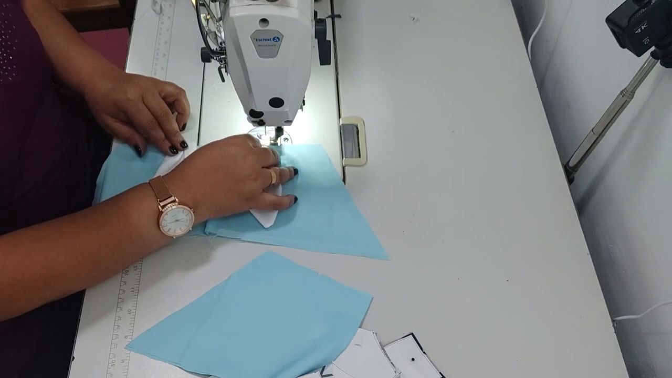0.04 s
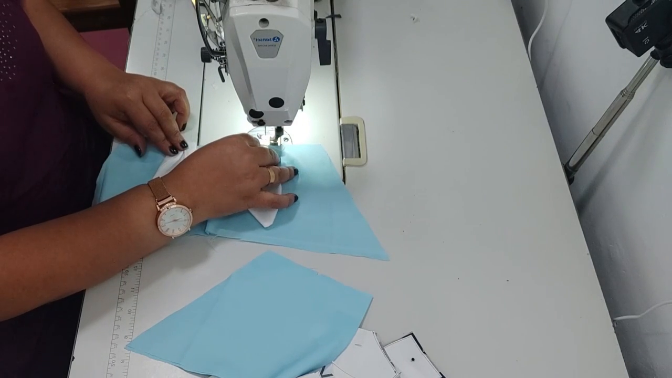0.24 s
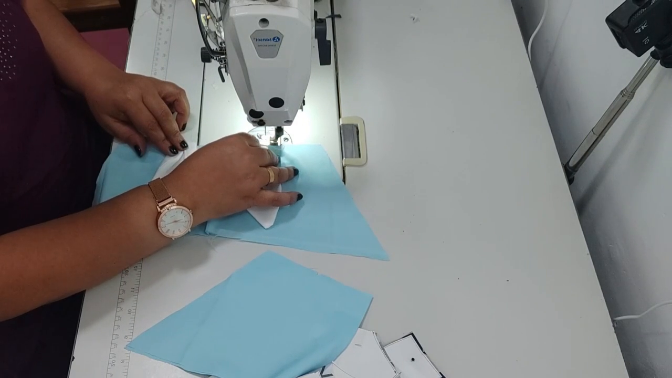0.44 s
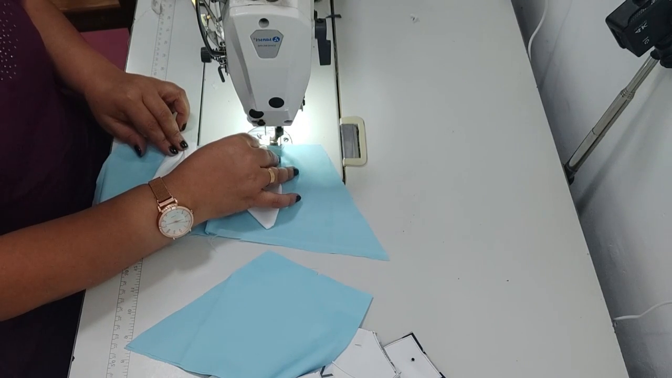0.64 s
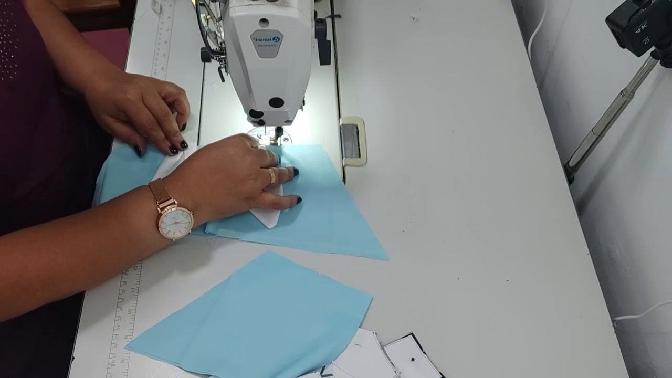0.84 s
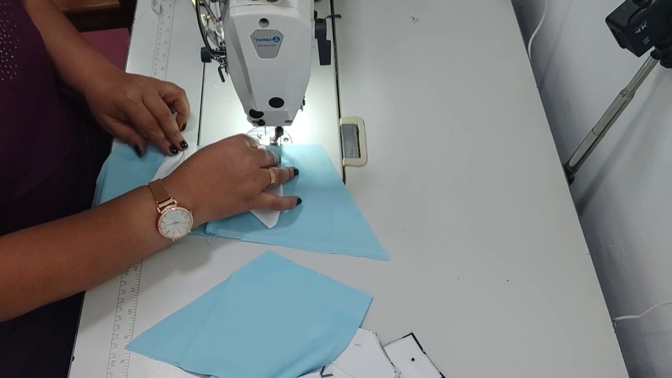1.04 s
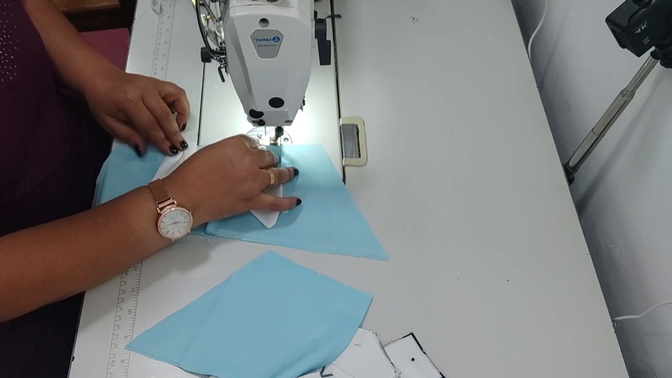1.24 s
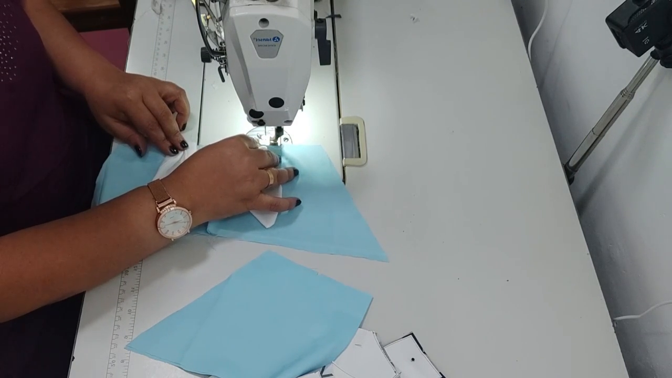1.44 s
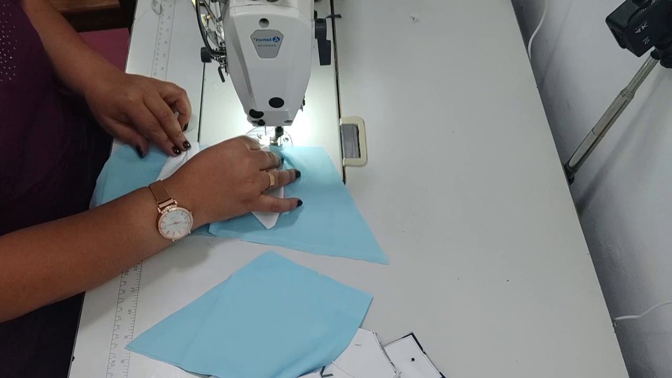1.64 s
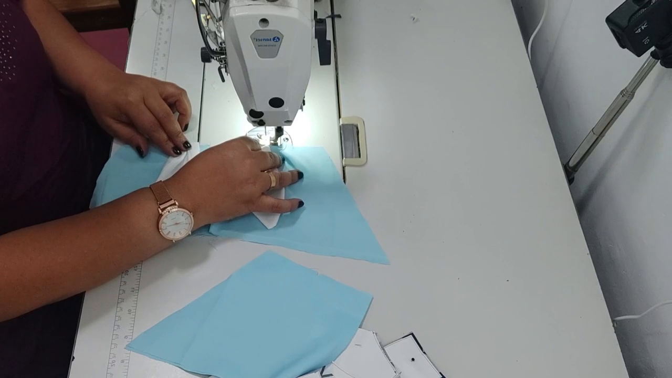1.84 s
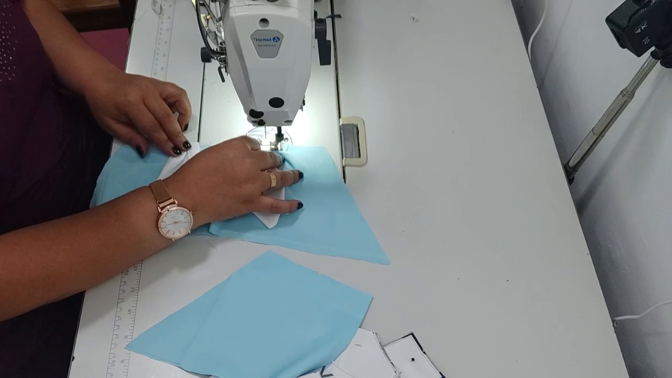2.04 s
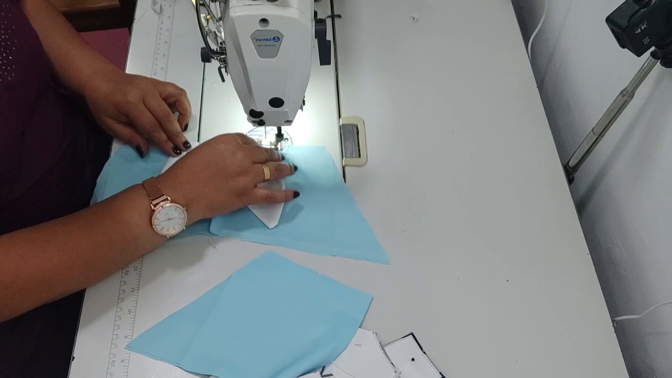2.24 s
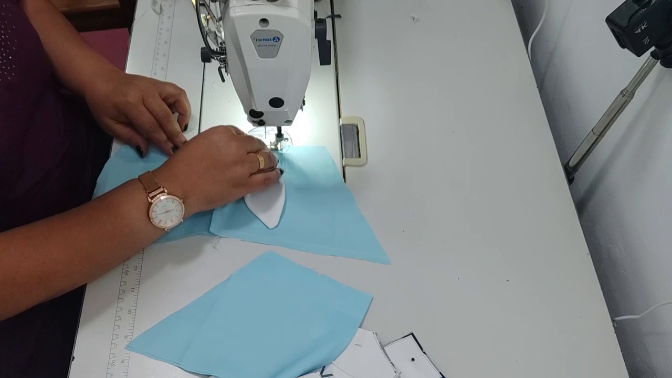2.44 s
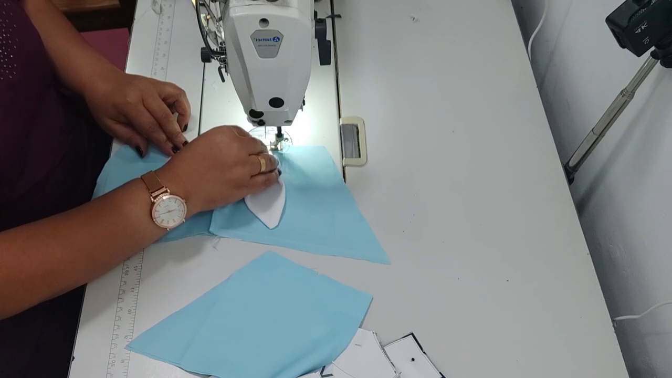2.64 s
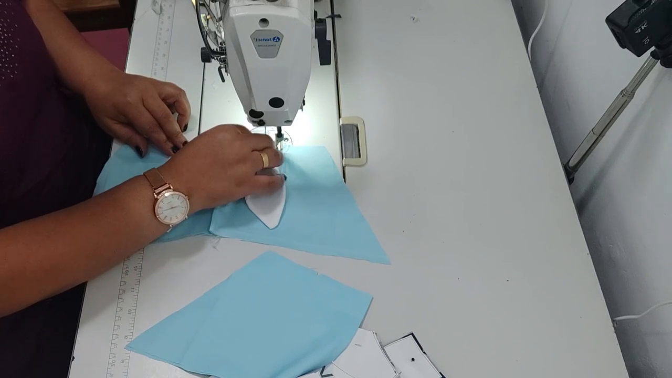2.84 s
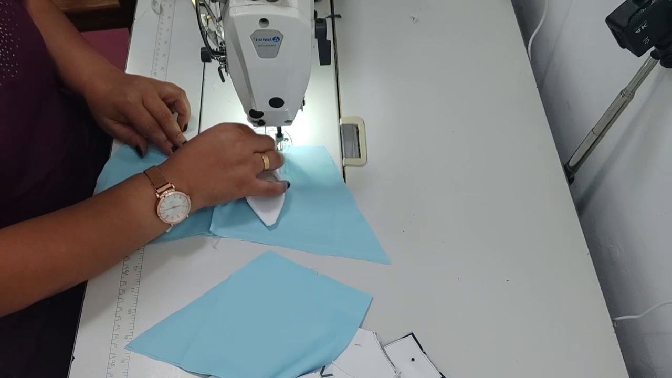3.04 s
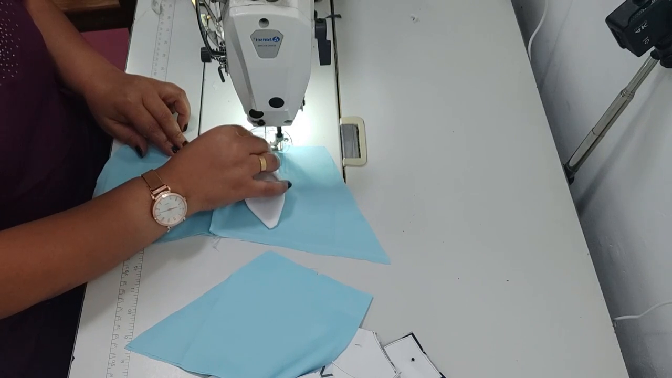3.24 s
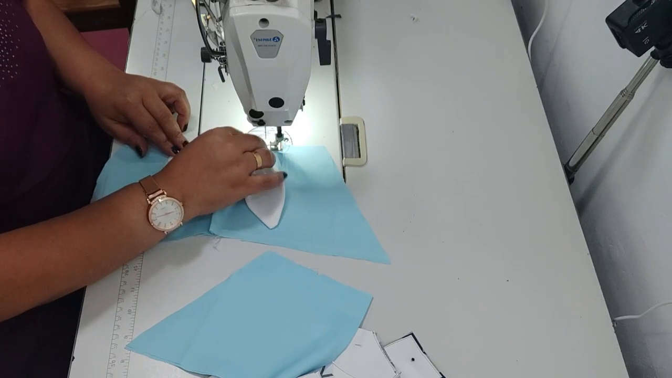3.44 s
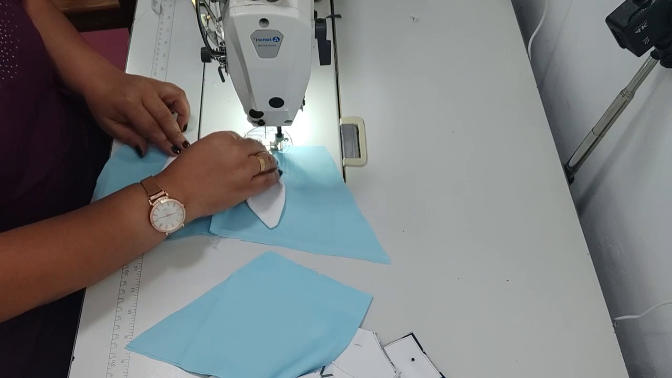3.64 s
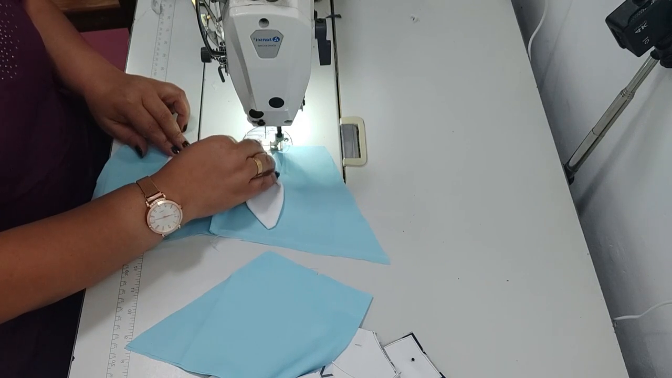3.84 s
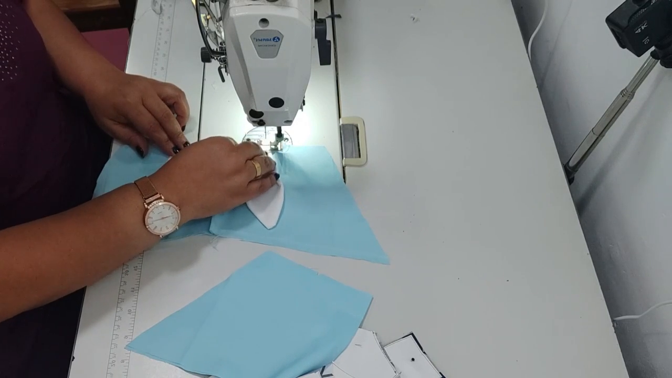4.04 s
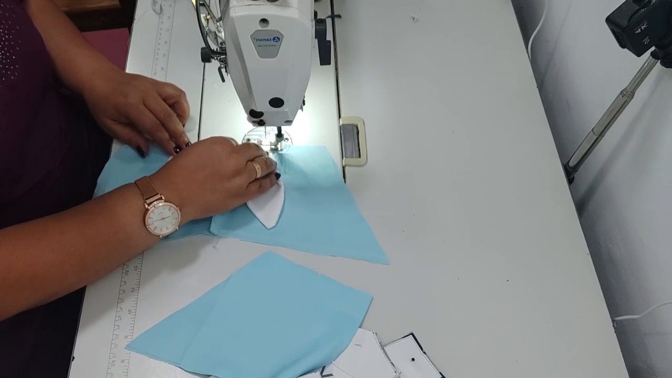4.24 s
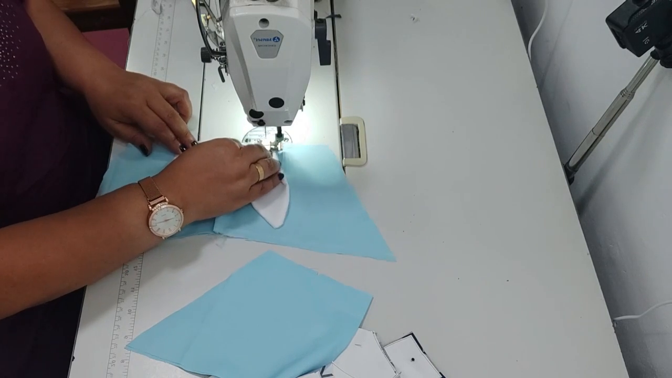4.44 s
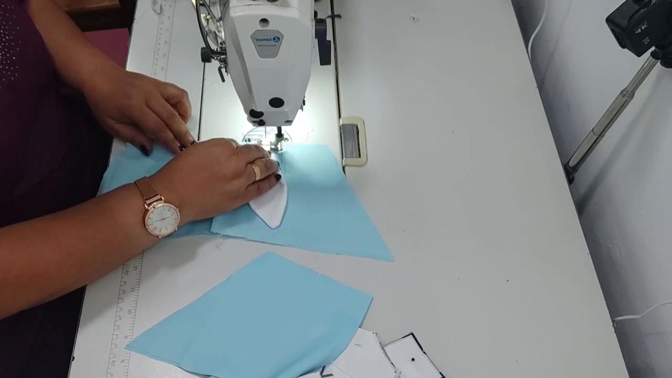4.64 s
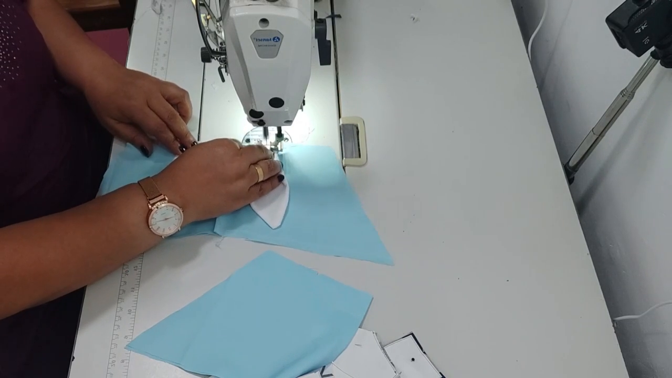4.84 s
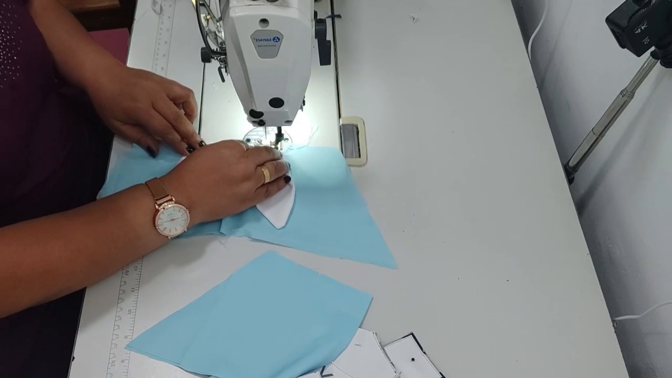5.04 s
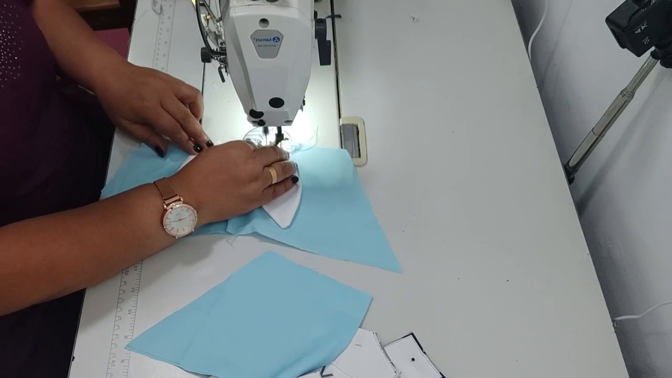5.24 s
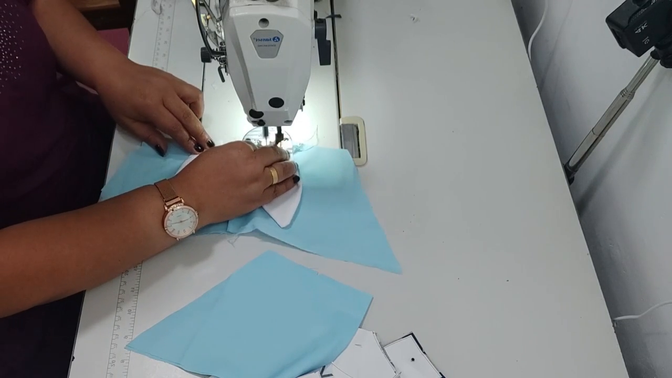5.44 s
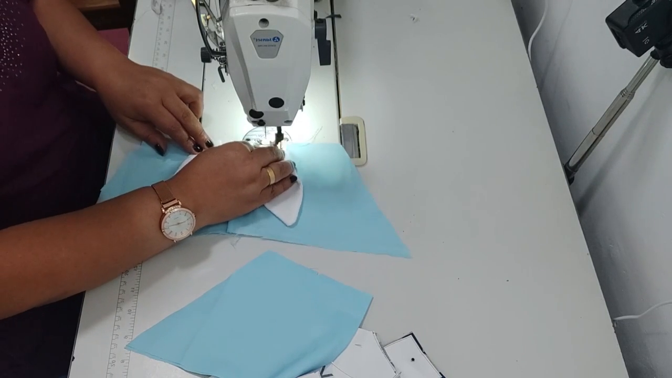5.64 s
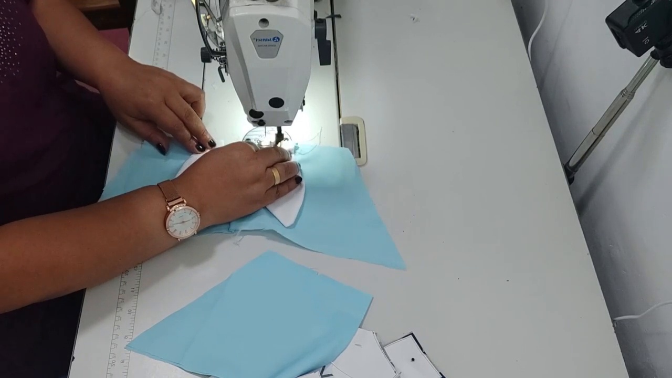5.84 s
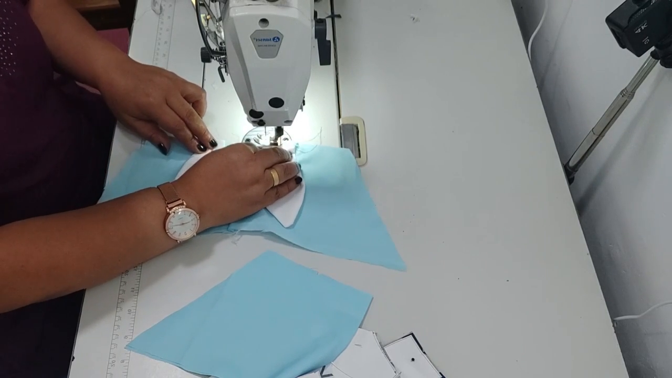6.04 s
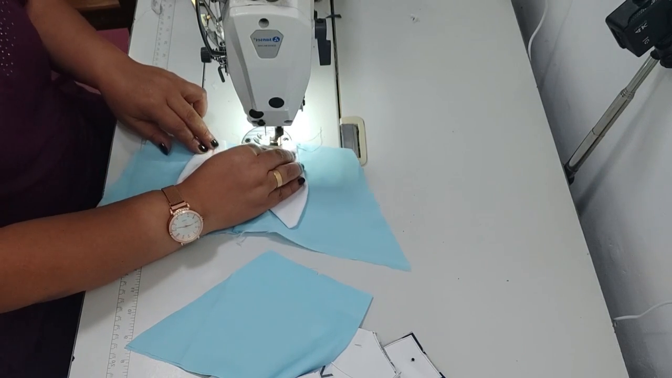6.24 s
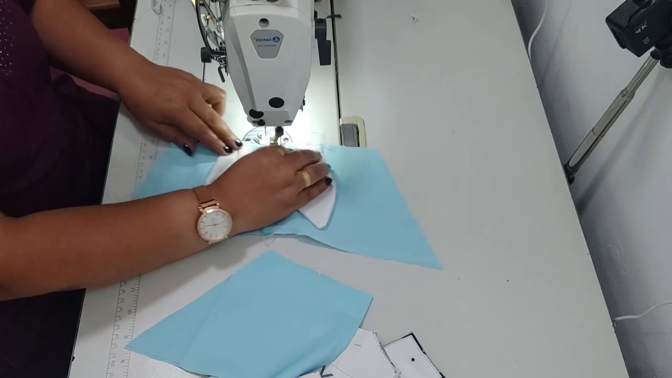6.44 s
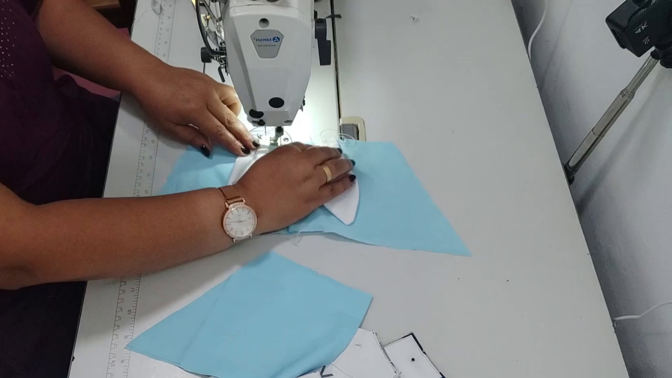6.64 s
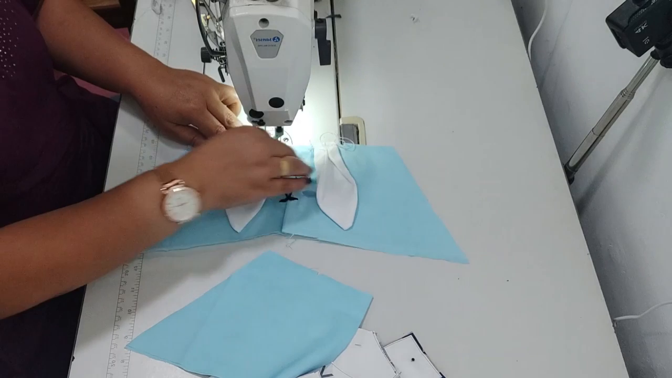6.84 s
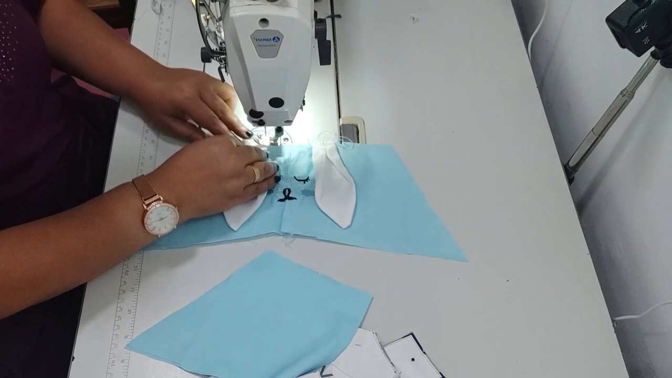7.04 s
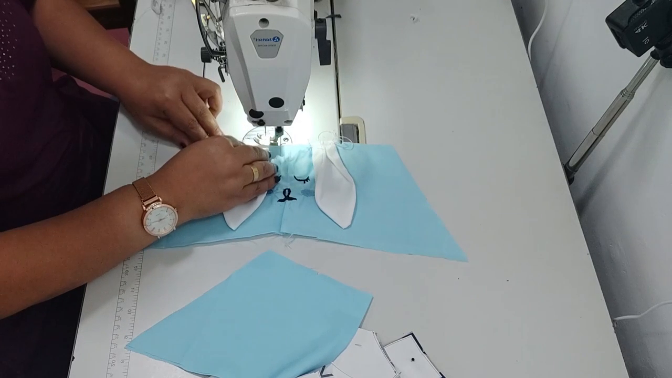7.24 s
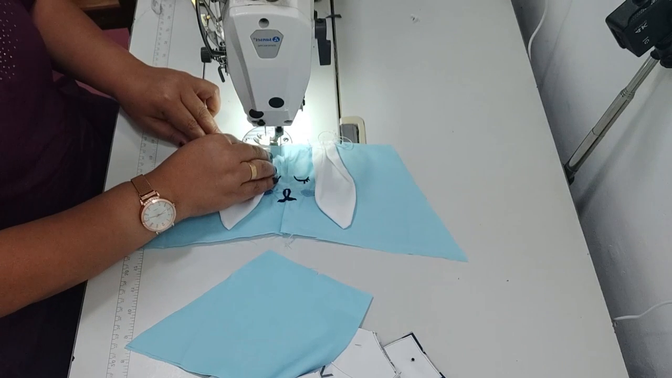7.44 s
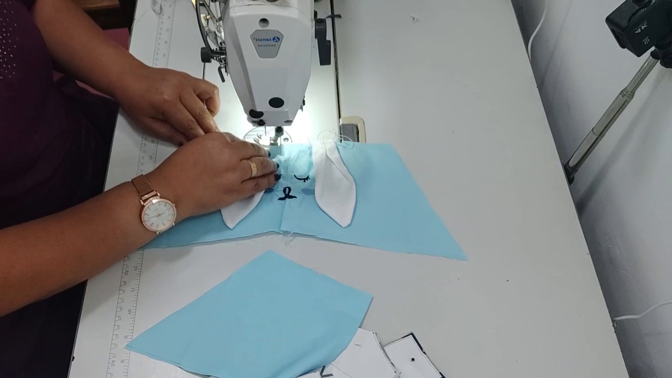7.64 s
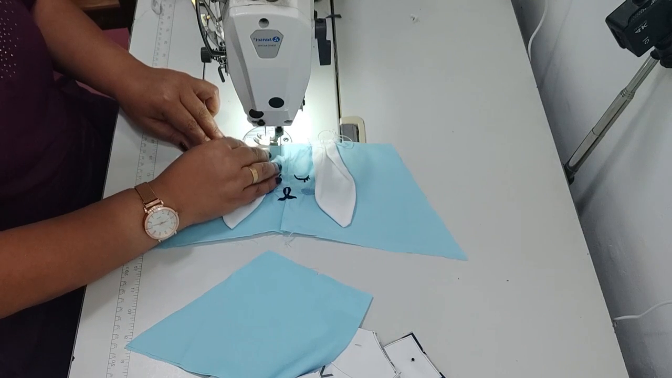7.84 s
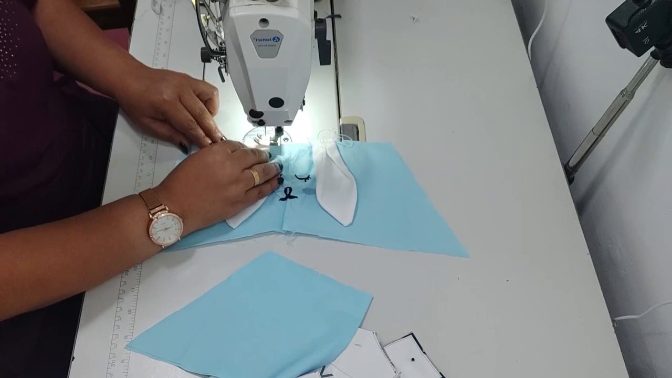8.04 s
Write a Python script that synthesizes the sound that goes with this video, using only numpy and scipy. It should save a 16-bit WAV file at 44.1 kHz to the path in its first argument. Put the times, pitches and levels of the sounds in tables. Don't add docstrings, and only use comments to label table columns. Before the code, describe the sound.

In a small hard-walled workroom with low hum and hiss, an industrial sewing machine's foot drops with a sharp clack and woody thud. After a quiet wait, stitching chatters in two fast uneven bursts, with bright clicks, table thumps and a short motor whine. Heavy trimmer clacks end it, a thin part rings, and cloth hisses as it is pulled. Close stereo pickup above the table, bass leaning left.

```python
import sys
import numpy as np
from scipy import signal
from scipy.fft import rfft, irfft
from scipy.io import wavfile
from scipy.ndimage import uniform_filter1d

SR = 44100
rng = np.random.default_rng(int(sys.argv[2]) if len(sys.argv) > 2 else 0)


def ratio(d):
    e = np.asarray(d, float) / 20
    return 10 ** e


def master(y):
    cut = np.clip(np.atleast_2d(y).T, -1, 1)
    pcm = np.round(cut * 32767)
    wavfile.write(sys.argv[1], SR, pcm.astype(np.int16))


N = 357210
T = np.arange(N) / SR


def unit(x):
    return x / np.sqrt(np.mean(x ** 2))


def colour(x, points):
    hz, db = np.transpose(points)
    f = np.fft.rfftfreq(N, 1 / SR) + 1
    curve_db = np.interp(np.log(f), np.log(hz), db, left=-90, right=-90)
    return irfft(rfft(x) * unit(ratio(curve_db)), N)


def band(x, hz, width_hz):
    b, a = signal.iirpeak(hz, hz / width_hz, SR)
    return signal.lfilter(b, a, x) * np.sqrt(SR / (np.pi * width_hz))


def ring(force, modes):
    out = 0
    for hz, db, t60_s in modes:
        pole = np.exp(2j * np.pi * hz / SR - np.log(1000) / (t60_s * SR))
        out = out + ratio(db) * signal.lfilter([1], [1, -pole], force).imag
    return out


def columns(rows):
    s, *rest = np.transpose(rows)
    return [np.interp(T, s, c) for c in rest]


def hold(start_s, length_s, edge_s):
    on = 1. * ((T > start_s) & (T < start_s + length_s))
    return uniform_filter1d(on, size=max(int(edge_s * SR), 1))


def gate(rows):
    return hold(rows[0][0], rows[-1][0] - rows[0][0], .02)


def walk(rate_hz):
    k = int(SR / rate_hz)
    steps = np.repeat(rng.standard_normal(N // k + 1), k)
    return 1.6 * uniform_filter1d(steps, k)[:N]


# freq_hz, left_minus_right_db, likeness [0-1]
MACHINE_SIDES = [(100, 4.5, 0.99), (397, 8, 1), (800, 4.5, 0.3), (1500, 3, 0), (4400, -0.5, 0.2),
                 (8000, 0.5, 0), (15000, 6, 0.19)]


def pair(sides=MACHINE_SIDES):
    hz, pan_db, like = np.transpose(sides)
    f = np.log(np.fft.rfftfreq(N, 1 / SR) + 1)
    like = np.clip(np.interp(f, np.log(hz), like), 0, 1)
    mid, side = rfft(rng.standard_normal((2, N))) * np.sqrt([(1 + like) / 2, (1 - like) / 2])
    tilt = ratio(np.interp(f, np.log(hz), pan_db) / 2)
    return irfft([(mid + side) * tilt, (mid - side) / tilt], N)


# freq_hz, density_db_per_hz
FLOOR_CURVE = [(12, -38), (20, 0), (38, -5), (103, -8.5), (120, -16), (194, -11), (233, -16), (346, -20.5),
               (528, -24.5), (603, -24), (1440, -34.5), (5120, -30), (5990, -30.5), (7800, -20.5),
               (11000, -54), (14300, -77.5), (22000, -120)]
# freq_hz, left_minus_right_db, likeness [0-1]
FLOOR_SIDES = [(60, 4, 0.6), (300, 8, 0.5), (695, 3, 0), (1400, 3.5, .3), (2780, 1, 0), (5000, -3.5, 0.13),
               (8950, -3, 0), (12000, 11, 0.17)]
# freq_hz, level_db
HUM_TONES = [(97, -62), (200, -69), (604, -79)]
# start_s, length_s, level_db
SIZZLE_SPELLS = [
    (0.342, 1.04, -84),
    (1.55, 0.42, -88),
    (2.85, 0.75, -84.5),
]
# centre_hz, width_hz, level_db
SIZZLE_BANDS = [(2270, 110, 7), (5220, 140, 13.5), (8800, 540, 18), (11700, 1400, 4.5), (13400, 1400, -1)]


def workroom():
    floor = ratio(-52.5 + 0.37 * walk(3.1)) * unit(colour(pair(FLOOR_SIDES), FLOOR_CURVE))
    hum = 0
    for hz, db in HUM_TONES:
        hum = hum + ratio(db + 3.5 + 1.6 * walk(34)) * np.sin(2 * np.pi * hz * T + 0.64 * walk(5.8))
    swell = sum(ratio(db) * hold(s, length_s, 0.074) for s, length_s, db in SIZZLE_SPELLS)
    sizzle = 0
    for hz, width_hz, db in SIZZLE_BANDS:
        tone = band(band(pair(), hz, width_hz), hz, width_hz)
        sizzle = sizzle + ratio(db) * tone * np.sqrt(width_hz / SR)
    return floor + hum * ratio([[3], [-3]]) + ratio(7) * swell * sizzle


# start_s, swell_s, fade_s, peak_db, scrape_share_db [1.5-4 kHz]
CLOTH_SLIDES = [
    (1.62, 0.094, .75, -51.5, -19),
]
CLOTH_PULLS = [
    (6.25, 0.36, .3, -44.5, -14),
    (6.64, .1, 0.048, -58.5, 4.5),
    (7.0, .12, .7, -56.5, -20),
    (7.56, .14, .3, -63.5, -22),
    (7.95, .08, .5, -62, -14.5),
]
# freq_hz, density_db_per_hz
SCRAPE_CURVE = [(900, -21), (1500, -8), (2300, -3.5), (3200, -7), (5000, -14), (6500, -31)]


def cloth():
    end_db = -13.5
    slide_curve = [(6500, -18), (8000, -11.0), (8800, -0.5), (9600, -20.5)]
    brush_curve = [(120, -4.5), (300, 4), (700, -8), (1000, -29.5)]
    out = 0
    for rows, bright in ((CLOTH_SLIDES, slide_curve), (CLOTH_PULLS, METAL_CURVE)):
        rub, scrape, flicker = 0, 0, ratio(1.2 * walk(60))
        for s, swell_s, fade_s, db, scrape_db in rows:
            stroke = [(s, db + end_db), (s + swell_s, db), (s + swell_s + fade_s, db + end_db)]
            shape = gate(stroke) * ratio(columns(stroke)[0]) * flicker
            rub = rub + shape
            scrape = scrape + ratio(scrape_db) * shape
        out = out + colour(rub * pair(), bright) + colour(scrape * pair(), SCRAPE_CURVE)
        out = out + colour(rub * ratio(-14) * pair(), brush_curve)
    return out


# start_s, pitch_hz, peak_db, t60_s
LOOSE_RINGS = [
    (2.08, 738, -53, .8),
    (6.135, 722, -43, .8),
    (6.39, 610, -51, .6),
    (6.42, 990, -60, .25),
]


def loose_parts():
    out = 0
    for s, hz, db, t60_s in LOOSE_RINGS:
        t = np.maximum(T - s, 0)
        decay = (1 - np.exp(-t / 0.0081)) * 1000. ** (-t / t60_s)
        out = out + ratio(db) * np.sin(2 * np.pi * hz * t) * decay
    return out * ratio([[2.5], [-2.5]])


# start_s, length_s, first_hz, last_hz, level_db
MOTOR_WHINE = [
    (4.304, 0.26, 976, 940, -43.5),
    (4.598, 0.065, 1060, 920, -42.5),
    (4.951, 0.45, 936, 950, -49.5),
    (5.392, 0.09, 1032, 1089, -34.5),
    (5.52, 0.069, 1065, 1010, -31),
]


def whine():
    wander, flicker, shiver = 1 + .012 * walk(14), ratio(2.0 * walk(40)), .5 * walk(150)
    out = 0
    for s, length_s, first_hz, last_hz, db in MOTOR_WHINE:
        pitch_hz = np.interp(T, [s, s + length_s], [first_hz, last_hz]) * wander
        phase = 2 * np.pi * np.cumsum(pitch_hz) / SR
        out = out + hold(s, length_s, .015) * ratio(db) * flicker * np.sin(phase + shiver)
    return out * ratio([[1.5], [-1.5]])


def rattle():
    t60_s = 0.067
    kicks = np.zeros(N)
    for rows, share_db in ((KNOCKS_ARM, -25.5), (STITCH_STROKES, -24.5)):
        for s, db, *_ in rows:
            kicks[int(s * SR)] = ratio(db + share_db)
    return signal.lfilter([1], [1, -1000. ** (-1 / (t60_s * SR))], kicks)


def backlash():
    gain, lead_s = np.ones(N), T[:SR // 40][::-1]
    for s, *_ in all_clicks():
        i = int(s * SR)
        gain[i - len(lead_s):i] *= 1 - .55 * np.exp(-lead_s / .005)
    return gain


# time_s, clatter_db [follows speed], shake_db [load on the frame]
SHAFT_RUN = [(3.8, -62.5, -75.5), (4.01, -55, -54), (4.1, -45.5, -40), (4.23, -80, -79.5),
             (4.265, -45.5, -39), (4.36, -23, -35), (4.44, -22, -29), (4.6, -24, -33.5),
             (4.68, -35.5, -39.5), (4.87, -37, -43.5), (5.09, -20.5, -34.5), (5.3, -28.5, -38),
             (5.37, -20.5, -25.5), (5.51, -45.5, -44), (5.73, -18, -25.5), (5.8, -28.5, -36),
             (5.98, -23.5, -29), (6.09, -48.5, -40.5)]
# start_s, length_s, rumble_db, sway_db [once a turn]
HEAD_SWAYS = [
    (4.06, .07, -46.5, -43),
    (4.38, .26, -40, -33.5),
    (4.644, .7, -51.5, -63.5),
    (5.353, .14, -34.5, -44.5),
    (5.6, .1, -49.5, -45),
    (5.687, .22, -42.5, -35),
    (5.92, .25, -55.5, -63),
]
# freq_hz, density_db_per_hz
GEAR_CURVE = [(530, -24.5), (900, -6), (1020, -8), (1080, -7.5), (1360, -9), (1820, -5), (2080, -3.5),
              (2580, -5.5), (3180, -11.5), (5000, -10), (6500, -32.5), (11000, -120)]


def running():
    coast_s, coast_db, turn_hz = .25, -22, 29.77
    last_s, *last_db = SHAFT_RUN[-1]
    rows = SHAFT_RUN + [(last_s + coast_s, *(np.add(last_db, coast_db)))]
    clatter_db, shake_db = columns(rows)
    gear_db = -7 + 0.45 * clatter_db + 0.55 * shake_db
    turn = 2 * np.pi * np.cumsum(turn_hz * (1 + 0.074 * walk(2.9))) / SR

    ticks = (rng.random(N) < 300 / SR) * ratio(np.minimum(3.0 * rng.exponential(size=N), 9))
    smear = signal.lfilter([1], [1, -np.exp(-1 / (0.0026 * SR))], ticks)
    throb = ratio(1.5 * np.sin(turn) + 1.2 * walk(60))
    grain = backlash() * unit(1 + .3 * smear) * throb
    clatter = colour(grain * ratio(clatter_db) * pair(), METAL_CURVE)
    gears = colour(grain * (ratio(gear_db + 3.4 * walk(30)) + rattle()) * pair(), GEAR_CURVE)

    frame = unit(ring(pair(), TABLE_MODES)) + ratio(-9.5) * unit(ring(pair(), ARM_MODES))
    shake = ratio(shake_db) * frame
    low_curve = [(20, -6.0), (30, -9.0), (55, -21.5), (85, 3.5), (105, 4), (130, -9.5)]
    low = colour(pair([(100, 5.5, 0.9)]), low_curve)
    rumble, rocking = sum(ratio(np.c_[db]) * hold(s, length_s, .05) for s, length_s, *db in HEAD_SWAYS)
    sway = rocking * np.sin(turn) * ratio([[3], [-3]]) + rumble * low
    return gate(rows) * (clatter + shake + sway) + gears


# time_s, peak_db, table_hz [favoured]
STITCH_STROKES = [(4.254, -32, 271), (4.281, -22.5, 283), (4.372, -15.5, 275), (4.408, -16, 278),
                  (4.479, -6.5, 320), (4.523, -33, 297), (4.557, -15, 280), (4.592, -8, 290.4),
                  (4.628, -28, 254), (4.795, -19.5, 275), (4.934, -21, 293), (5.014, -18.5, 274),
                  (5.071, -9.5, 269), (5.122, -16.5, 276), (5.194, -16.5, 275), (5.727, -21, 275)]
# time_s, peak_db, arm_share_db, table_hz, arm_hz [favoured]
KNOCKS_ARM = [(1.969, -44.5, -7.5, 359, 697), (2.076, -10, -8.5, 277, 532), (2.168, -22.5, -14, 291, 719),
              (3.174, -54, 7.5, 167, 1090), (3.85, -51, -1, 164, 920), (3.943, -48, 7.5, 161, 1000),
              (4.051, -29.5, -8, 295, 540), (4.087, -24, -6, 258, 527), (4.438, -19.5, -8.5, 280, 600),
              (4.5, -12.5, -2, 353, 600), (5.346, -10, 0.5, 422, 545), (5.39, -9, -11, 337, 850),
              (5.419, -18, -1.5, 285, 1090), (5.604, -4.5, -7, 351, 1020), (5.659, -18.5, -8, 282, 607),
              (5.759, -32, -1, 297, 610), (5.909, -10, 4.5, 290, 923), (5.983, -4.5, -20, 288.6, 910),
              (6.002, -14, -4, 343, 1220), (6.114, -17.5, -13, 277, 493), (6.134, -10.5, -3, 400, 703),
              (6.14, -31, 9.5, 398, 1110), (6.19, -33, -20, 240, 700), (6.44, -49, -2.5, 190, 592)]


def all_blows():
    rows = [(s, db, -23.5, hz, 580) for s, db, hz in STITCH_STROKES] + KNOCKS_ARM
    out = []
    for row in rows:
        s, db = row[:2]
        damp = max(1.92 + 0.0357 * (db + 10), .4) if s > 4.45 else 1.0
        out.append((*row, damp))
    return out


# freq_hz, level_db, t60_s
TABLE_MODES = [(90, -14, .25), (161.6, -19.5, 0.31), (189.5, -3, 0.27), (232.5, 2.5, 0.17),
               (275, 2.5, 0.18), (293.2, -5, 0.11), (339.8, -3, 0.16), (399.4, -16.5, 0.31),
               (435.3, -17.5, 0.22)]
ARM_MODES = [(540, -8, 0.17), (600.5, 0.5, 0.14), (673, 0, 0.16), (718, -19, 0.3), (843, -1, .15),
             (957.6, -15.5, 0.27), (1010, -6.5, 0.13), (1089, -6, 0.1), (1220, -5.5, 0.12)]


def thuds():
    out, t = np.zeros((2, N + SR)), T[:SR // 2]
    hz, db, t60_s = np.transpose(TABLE_MODES + ARM_MODES)[:, :, None]
    upper = np.arange(len(hz))[:, None] >= len(TABLE_MODES)
    blows = all_blows()
    chance = rng.standard_normal((len(blows), 4, len(hz), 1))
    for (s, peak_db, arm_db, table_hz, arm_hz, damp), (size, turn, drift, lean) in zip(blows, chance):
        octaves_off = np.log2(hz / np.where(upper, arm_hz, table_hz))
        favour_db = -12 * (1 - np.exp(-(octaves_off / .12) ** 2))
        gain = ratio(peak_db - 2.5 + 0.57 * db + upper * arm_db + favour_db + 2.5 * size)
        tone = np.sin(2 * np.pi * hz * (1 + 0.017 * drift) * t + 0.69 * turn)
        decay = 1000. ** (-t * damp * 1.02 ** upper / t60_s)
        waves = gain * tone * decay * (1 - np.exp(-t / 0.0037))
        i = int(s * SR)
        out[0, i:i + len(t)] += ratio(6.0) * waves.sum(axis=0)
        out[1, i:i + len(t)] += ratio(-2.0) * (waves * (1 + .7 * upper * lean)).sum(axis=0)
    return signal.sosfilt(signal.butter(2, 80, "high", fs=SR, output="sos"), out[:, :N])


# time_s, peak_db, mid_share_db [1.5-4 kHz], pitch_hz
LEVERS = [(2.0532, -25, -7, 2640), (2.06, -27.5, -9, 3410), (2.0647, -21.5, -8.5, 2790),
          (2.075, -1.5, -13.5, 1930), (2.1044, -9, -12.5, 1980), (2.1163, -11, -25, 2250),
          (3.1739, -37, -11.5, 1960), (3.847, -38, -13.5, 2310), (3.9409, -19, -27, 2570),
          (3.9968, -29.5, -5, 2130), (4.077, -20, -15, 1390), (5.347, -25, 2.5, 1280),
          (5.906, -5, -9, 1570), (5.9776, -6.5, -12, 2020), (6.0018, -17.5, 12.5, 1750),
          (6.113, -2, -9, 2486), (6.1385, -9, -5, 1636), (7.1094, -47, -18, 3220), (7.6994, -46, -18, 2350)]
# time_s, peak_db
HOOKS = [(4.2497, -32.5), (4.2552, -12), (4.341, -11.5), (4.3505, -10.5), (4.372, -9), (4.3964, -8),
         (4.4662, -9), (4.9137, -12.5), (4.9856, -7.5), (5.0481, -7.5), (5.1356, -11.5), (5.197, -12),
         (5.2874, -11), (5.3247, -7), (5.5129, -25.5), (5.5604, -10.5), (5.5832, -7.5), (5.7048, -10),
         (5.7453, -5.5), (5.8677, -4.5)]
# time_s, peak_db, pitch_hz
FEEDS = [(4.2996, -15, 2650), (4.4748, -3.5, 2596), (4.564, -21.5, 1990), (4.6003, -14, 1870),
         (4.6124, -4, 2600), (4.7816, -17, 1930), (4.8894, -15.5, 2150), (5.1643, -14.5, 1950),
         (5.226, -12, 1920), (5.362, -9.5, 2280), (5.5359, -11.5, 3720), (5.6012, -3.5, 2650),
         (5.8429, -13, 1980)]


def all_clicks():
    hook = [(s, db, -22.5, 2500) for s, db in HOOKS]
    feed = [(s, db, -9.5 + 0.3 * db, hz) for s, db, hz in FEEDS]
    return LEVERS + hook + feed


# freq_hz, density_db_per_hz
METAL_CURVE = [(2350, -31.5), (4000, -16.5), (4700, -19.5), (6110, -11.5), (7560, -0.5), (8330, 1),
               (8870, -2), (10200, -26.5), (11300, -28), (12500, -27), (13700, -29), (14900, -30.5),
               (15700, -38.5)]


def clicks():
    high, mid, pitched = np.zeros((3, 2, N))
    t = T[:SR // 3]
    noise = pair()
    events = all_clicks()
    pans_db = 2 * rng.standard_normal(len(events))
    for (s, db, mid_db, pitch_hz), pan_db in zip(events, pans_db):
        i = int(s * SR)
        ring_db = -3 - 0.08 * db
        shape = np.exp(-t / .002) + ratio(ring_db) * 1000. ** (-t / .11)
        shape = shape * (1 - np.exp(-t / 0.00055))
        shape = (ratio(db - 8.5) * shape * ratio([[pan_db], [-pan_db]]))[:, :N - i]
        high[:, i:i + len(t)] += shape
        mid[:, i:i + len(t)] += ratio(min(mid_db, -11) - 1) * shape
        struck = ratio(mid_db + 0.5) * shape * noise[:, i:i + len(t)]
        pitched[:, i:i + len(t)] += band(struck, pitch_hz, 450)
    hush = backlash()
    return colour(hush * high * pair(), METAL_CURVE) + colour(hush * mid * pair(), GEAR_CURVE) + hush * pitched


def walls(machine):
    t60_s, level_db = 0.36, -2.5
    t = T[:SR // 2]
    tail = pair()[:, :len(t)] * 1000. ** (-t / t60_s) * (t > .006)
    echo = signal.fftconvolve(machine.mean(axis=0, keepdims=True), tail, axes=1)[:, :N]
    return ratio(level_db) * echo / np.sqrt(np.mean(np.sum(tail ** 2, axis=1)))


def scene():
    machine = loose_parts() + whine() + running() + thuds() + clicks()
    return workroom() + cloth() + machine + walls(machine)


def roll_off(x):
    return signal.sosfilt(signal.butter(12, 15880, fs=SR, output="sos"), x)


def record(dry):
    return roll_off(np.clip(dry, -1, 1))


dry = scene()
out = record(dry)
master(out)
```